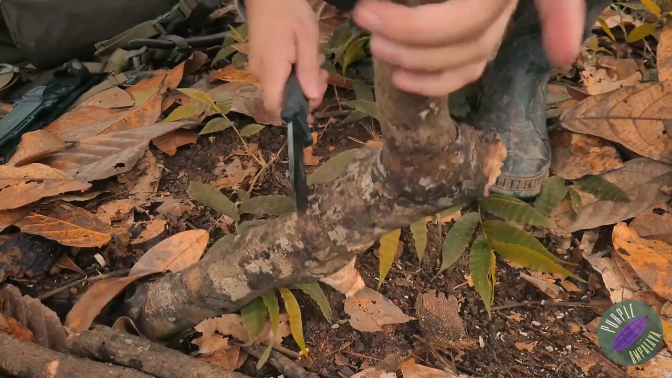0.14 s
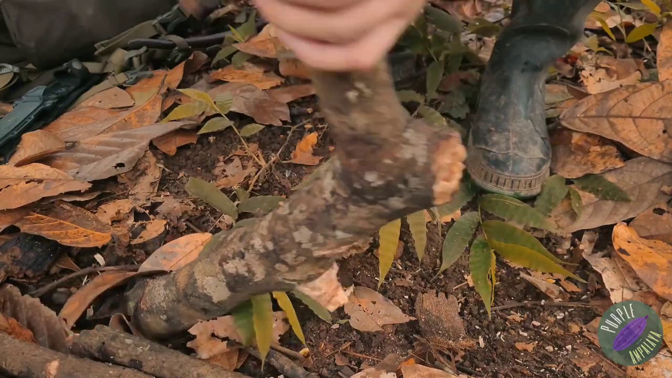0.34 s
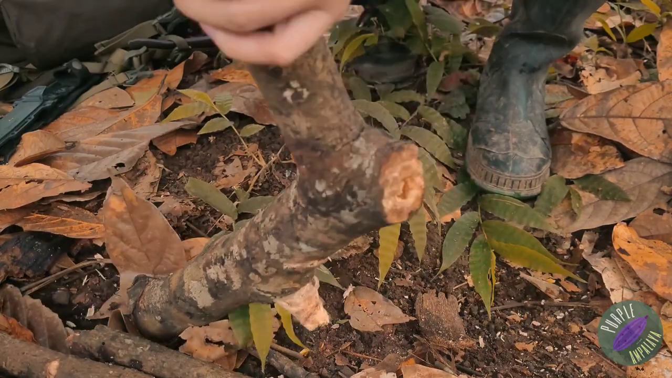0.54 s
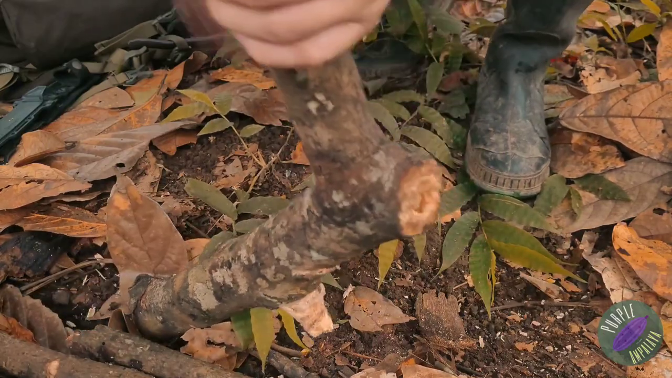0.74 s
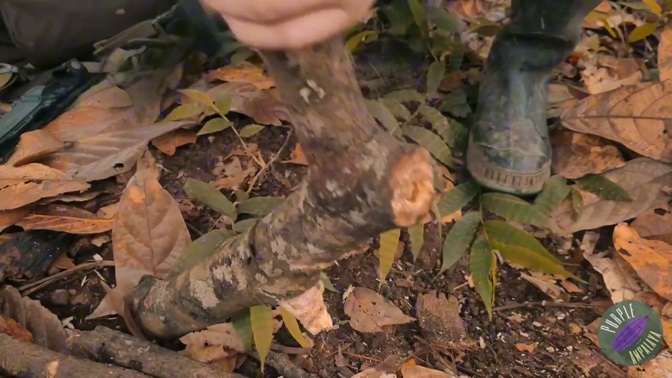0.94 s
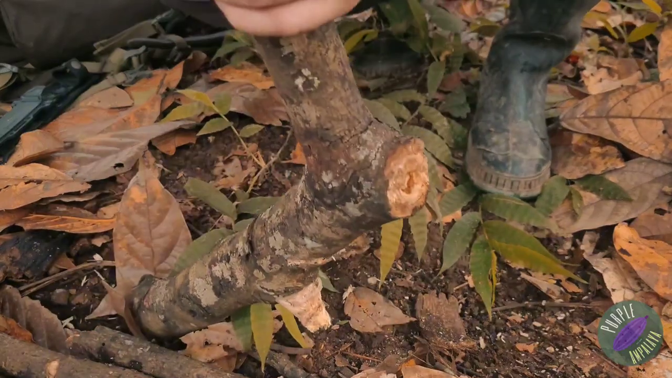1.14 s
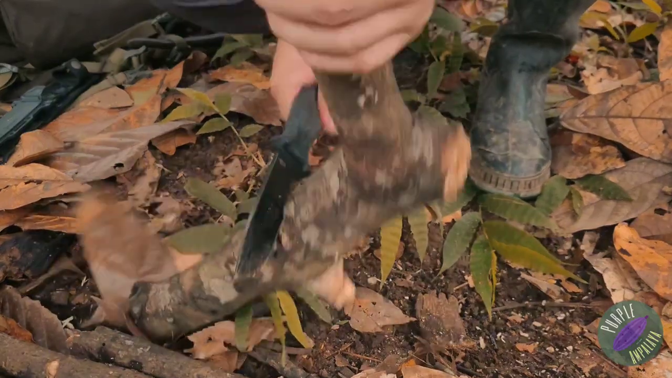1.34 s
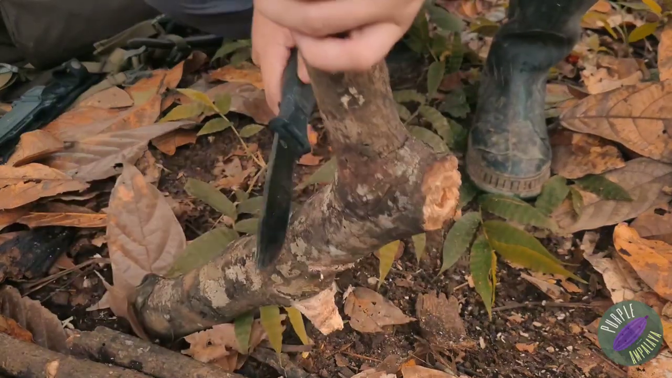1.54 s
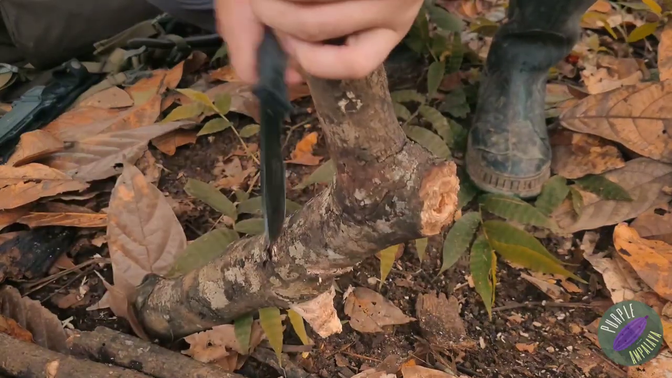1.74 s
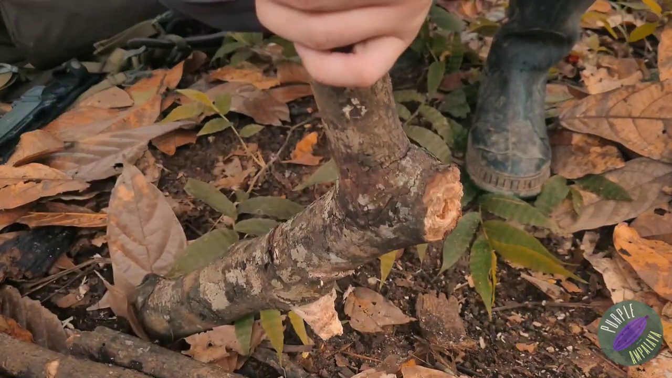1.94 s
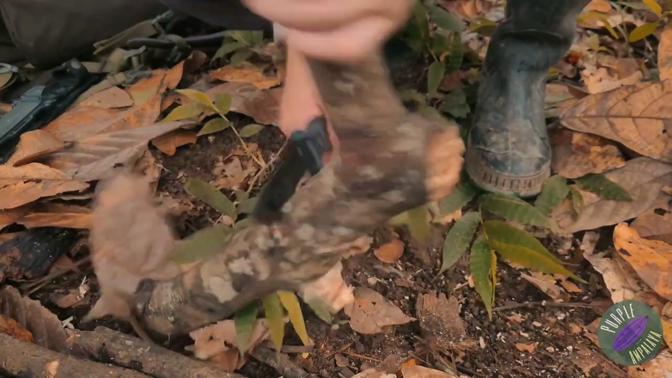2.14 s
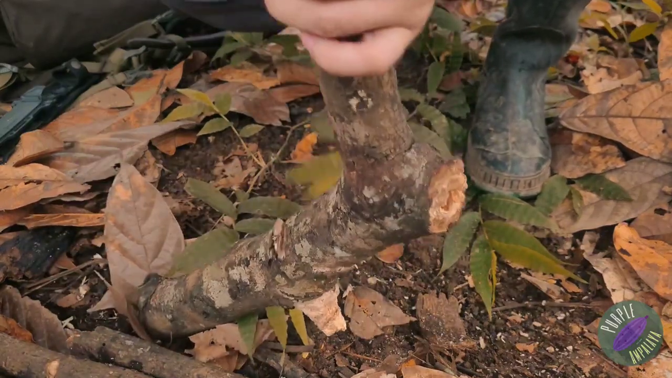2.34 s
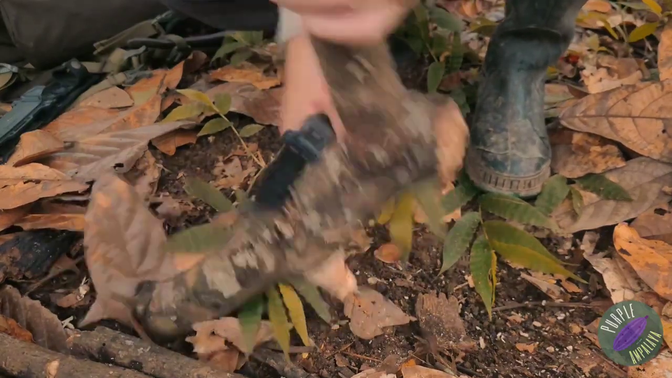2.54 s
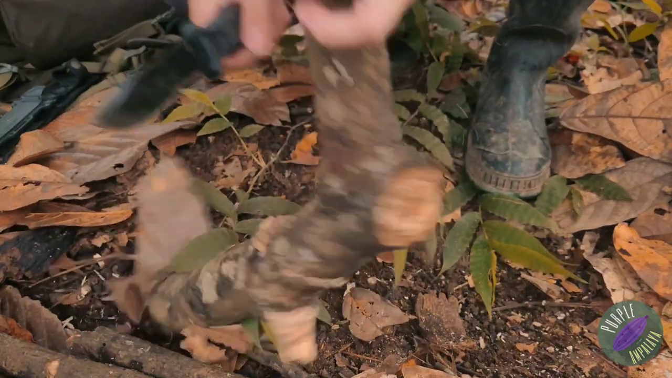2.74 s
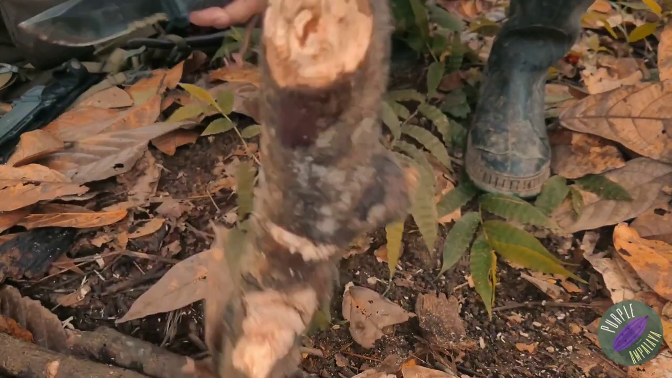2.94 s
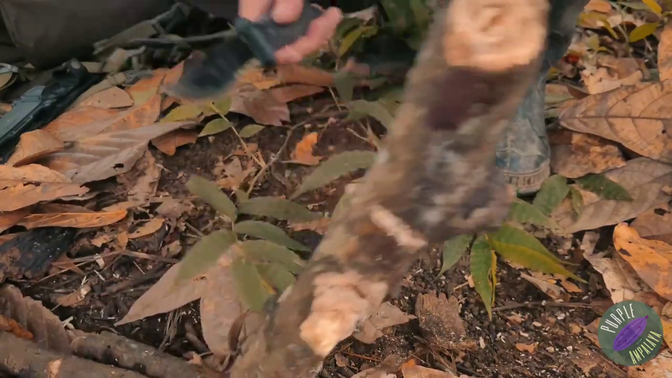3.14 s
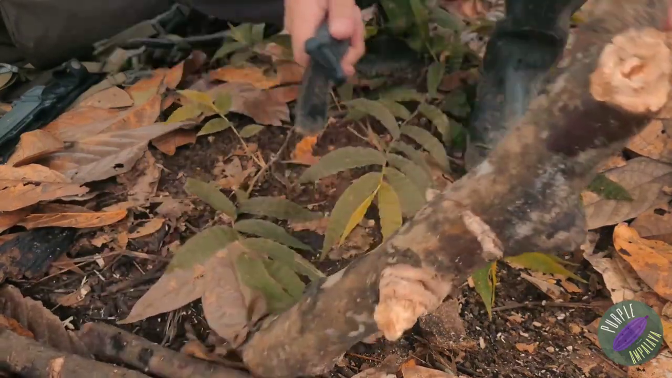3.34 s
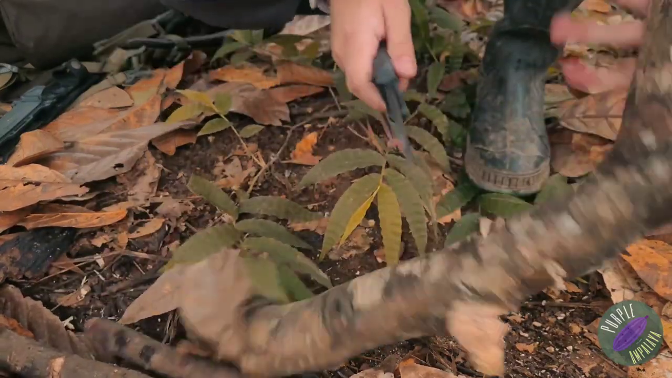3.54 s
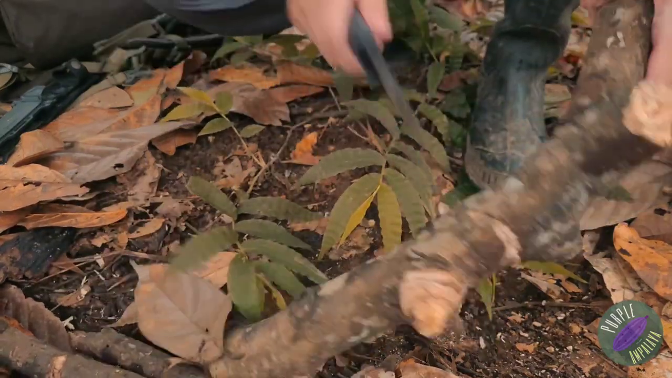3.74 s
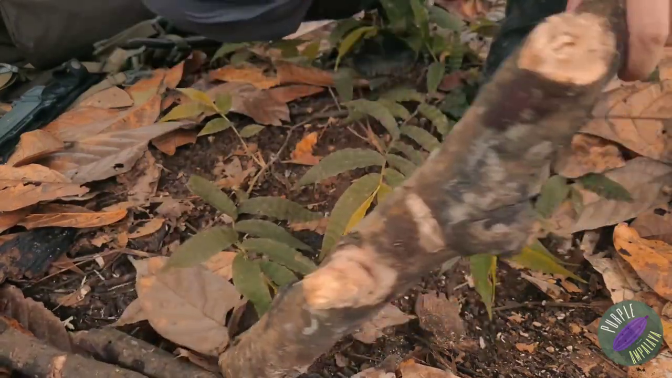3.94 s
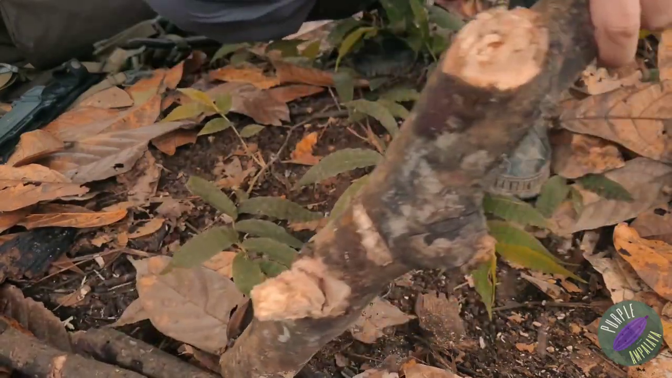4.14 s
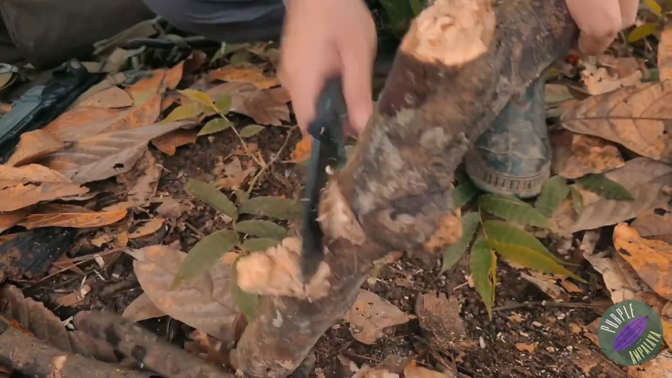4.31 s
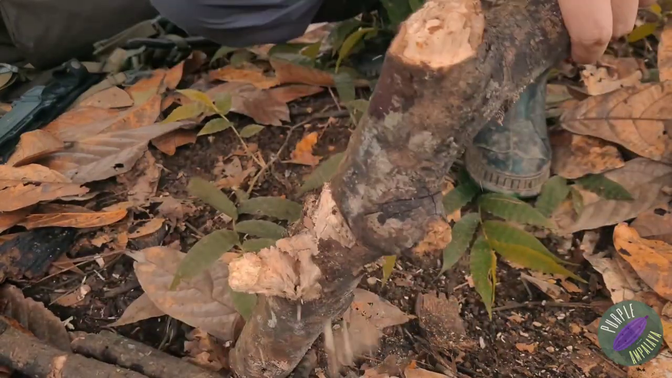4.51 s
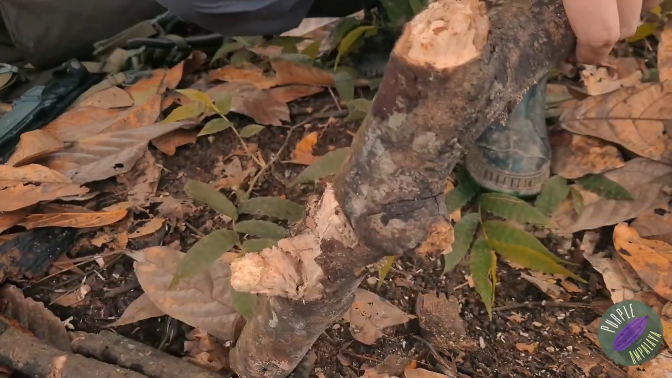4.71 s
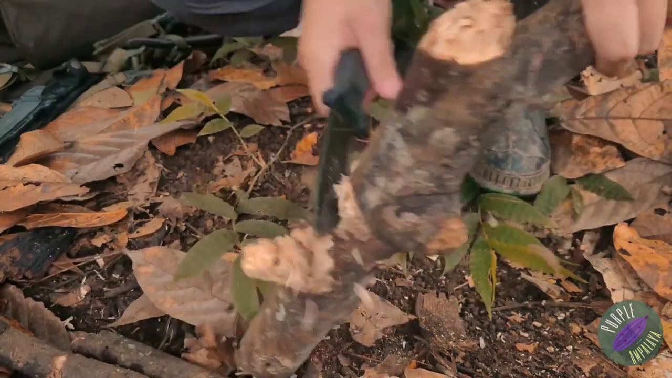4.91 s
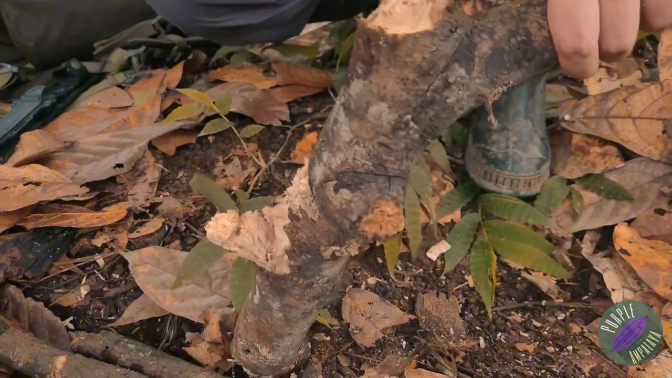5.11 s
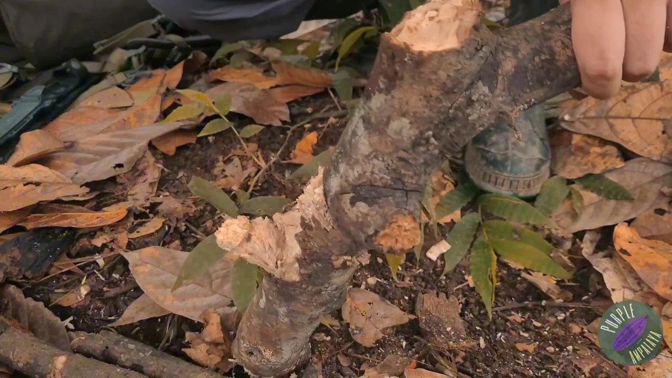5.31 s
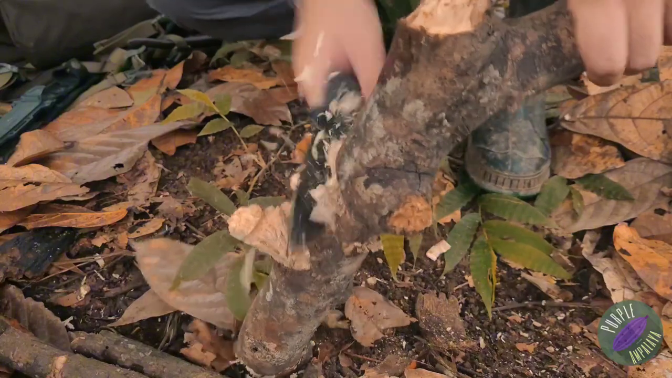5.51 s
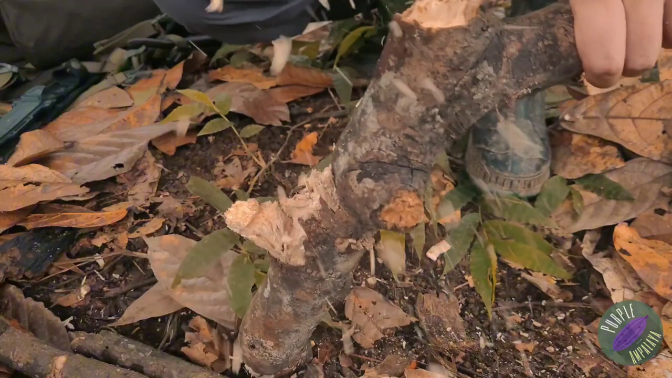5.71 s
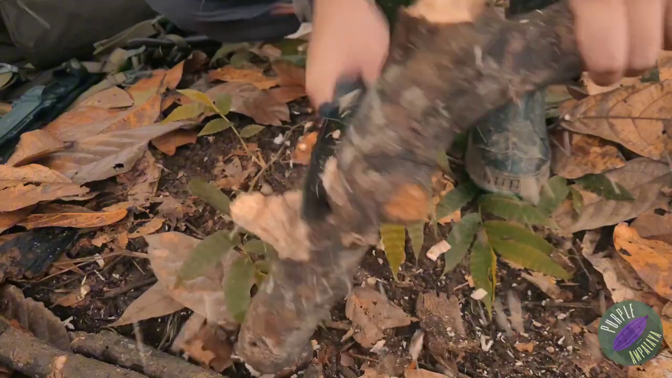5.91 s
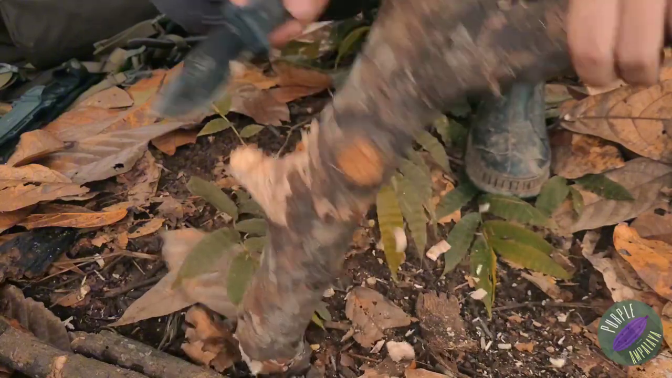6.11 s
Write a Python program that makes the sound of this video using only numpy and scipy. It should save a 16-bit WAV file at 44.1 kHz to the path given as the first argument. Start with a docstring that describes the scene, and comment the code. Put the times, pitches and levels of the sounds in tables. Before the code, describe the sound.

Close stereo pickup in a quiet forest, with faint low rumble, soft air and a thin high insect shimmer throughout. Light leaf shuffles and small taps open the scene; a distant bird gives short falling chirps from 0.4 s, another a rising whistle at 1.2 s. A heavy knife cracks into a thick branch at about 0.8, 1.3, 2.1 and 2.5 s: sharp bark snap, short hollow wood knock, dull soil thump, quick scatter off trunks. Woody clicks come near 1.4 to 1.5 s. From 2.6 to 4 s the branch is hauled through dry leaves in uneven scrapes and crisp crackles. The fifth blow at 4.2 s splits with a brief fibrous tear. More chops land at 4.8, 5.5 and 5.9 s, brighter or duller, with chips and crumbs pattering onto leaves. Birds call again around 5.2 s and 6.1 s; leaf rustle ends it at 6.3 s.

```python
"""Close by in a forest, a heavy knife strikes a branch propped on the ground eight times in 6.3 s.
From the start: filtered-noise rumble, air and insects, leaf scrapes and crackle, click-cluster taps.
From 0.4 s a far bird chirps as noise-modulated falling glides; from 1.2 s another whistles, rising.
From 0.8 s each blow sums a noise crack, decaying modes, a ground thump and scatter; crumbs tap after it.
From 2.6 s the branch is hauled through the litter; at 4.2 s the fifth blow also tears fibres in grain bursts."""
import sys
import numpy as np
from scipy import signal
from scipy.fft import rfft, irfft
from scipy.io import wavfile
from scipy.ndimage import uniform_filter1d

SR = 44100
rng = np.random.default_rng(int(sys.argv[2]) if len(sys.argv) > 2 else 0)


def wrap_up_sound(samples):
    """Save the sound to the file named by the first command line argument, as 16-bit audio."""
    columns = np.atleast_2d(samples).T
    # keep every value between -1 and 1, then stretch to whole-number steps
    tamed = np.clip(columns, -1, 1)
    steps = np.round(tamed * 32767).astype(np.int16)
    wavfile.write(sys.argv[1], SR, steps)


N = 276066  # samples


def amp(db):
    """Level: decibels to an amplitude ratio."""
    return 10 ** (np.asarray(db) / 20)


def evened(x):
    """Normalisation: scales to unit rms."""
    return x / np.sqrt(np.mean(x ** 2) + 1e-20)


def read(points, hz):
    """Interpolation of a spectrum on a log-frequency axis."""
    f, value = np.transpose(points)
    return np.interp(np.log(hz + 1), np.log(f + 1), value)


def add(mix, s, sound):
    """Superposition: adds a sound to the mix from time s."""
    part = mix[:, max(round(s * SR), 0):][:, :sound.shape[-1]]
    part += sound[..., :part.shape[1]]


def bins(x):
    """Discrete Fourier transform: the frequencies of its bins."""
    return np.fft.rfftfreq(x.shape[-1], 1 / SR)


def colour(x, points):
    """Minimum-phase filtering: a causal response of unit energy with the given spectral shape."""
    log_gain = np.log(amp(read(points, abs(np.fft.fftfreq(2048, 1 / SR)))))
    # the phase is the Hilbert transform of the log gain
    spectrum = np.exp(signal.hilbert(log_gain).conj())
    taps = np.fft.ifft(spectrum).real[:1024]
    return signal.oaconvolve(x, taps[None] / np.linalg.norm(taps), axes=1)[:, :x.shape[1]]


def tilted(points, db_per_octave):
    """Spectral tilt: a brighter or duller version of a spectrum."""
    return [(hz, db + db_per_octave * np.log2(hz)) for hz, db in points]


def panned(db):
    """Level difference: gains of the two channels, half the left-right difference each way."""
    return amp(np.array([[.5], [-.5]]) * db)


def ports(x):
    """Arrival-time difference: sound from the branch reaches the left microphone 4 samples early."""
    return np.array([x, np.pad(x, (4, 0))[:len(x)]])


# Diffuse-field coherence at close microphones: f/Hz, left-right likeness (0 to 1)
LIKENESS = [(40, 0.94), (130, 0.9), (300, 0.92), (640, 0.68), (1300, 0.027), (16000, 0.0037)]


def diffuse(x):
    """Diffuse-field coherence: two unrelated channels become alike in the bass."""
    a, b = rfft(x)
    same = np.clip(read(LIKENESS, bins(x)), -1, 1)
    return irfft([a, same * a + np.sqrt(1 - same ** 2) * b], x.shape[1])


def ring(t, hz, t60, rise):
    """Modal decay: a mode excited around t = 0 by a push that builds over the rise time."""
    decay = amp(-60 * np.maximum(t, 0) / t60)
    build = np.exp(-(np.minimum(t, 0) / rise) ** 2)
    return np.cos(2 * np.pi * hz * t) * decay * build


def grains(size, per_s, spread_db):
    """Shot noise: two channels of random clicks of uneven size, unit rms."""
    sizes = amp(spread_db * np.minimum(rng.exponential(1, (2, size)), 4))
    signs = rng.choice([-1, 1], (2, size))
    happens = rng.random((2, size)) < per_s / SR
    return evened(sizes * signs * happens)


# Spectral shape of the sound scattered back: f/Hz, relative level/dB
SCATTER_SPECTRUM = [(40, 1), (150, -4.5), (400, 0), (900, -3), (2000, 0), (5000, -1), (10000, -4.5),
                    (16000, 2.5)]
# Main decay of the scatter: f/Hz, t60/s
FOREST_DECAY = [(100, 0.37), (400, 0.17), (900, .24), (2500, 0.23), (7000, 0.26), (16000, 0.18)]


def forest(x, near_db=2.5, near_t60=.07, far_db=-32, far_t60=0.93):
    """Multiple scattering: dense echoes of ground and trunks, with a faint slow tail of farther trees."""
    echoes = diffuse(grains(size=SR // 2, per_s=9000, spread_db=2.5))
    hz, t, z = signal.stft(echoes, SR, nperseg=128)
    main = amp(-60 * t / read(FOREST_DECAY, hz)[:, None])
    near = amp(near_db - 60 * t / near_t60)
    far = amp(far_db - 60 * t / far_t60)
    tail = signal.istft(z * (main + near + far), SR)[1]
    # the echoes set in over about 3 ms
    tail *= 1 - np.exp(-(np.arange(tail.shape[1]) / SR / .003) ** 2)
    tail = colour(tail / np.linalg.norm(tail, axis=1, keepdims=True), SCATTER_SPECTRUM)
    return signal.fftconvolve(x, tail, axes=1)[:, :x.shape[1]]


# Swell of the low rumble before gusts: t/s, level/dB
RUMBLE_SWELL = [(0, -55), (.8, -52.5), (1.2, -57.5), (2.55, -58), (3.05, -51), (3.6, -55.5), (4.4, -53),
                (5.3, -60), (5.55, -50.5), (6.26, -54.5)]
# Spectral shape of the rumble, shared by the shaking soil: f/Hz, relative level/dB
RUMBLE_SPECTRUM = [(12, -31), (28, -11.5), (50, 2.5), (75, -0.5), (120, -2), (180, -13), (280, -11.5),
                   (450, -24.5), (800, -41), (2000, -69)]
# Spectral shape of still forest air: f/Hz, relative level/dB
AIR_SPECTRUM = [(200, -11), (400, -2.5), (700, -6.5), (1300, -9.5), (2500, -4.5), (3600, -6), (5000, 1),
                (6200, -2.5), (8400, -8), (11000, -0.5), (16000, -5)]
AIR_DB = -66.5
# Resonance-shaped bands of the insect choruses: f/Hz, half width/Hz, level before the swell/dB
INSECT_BANDS = [(7410, 220, -63.5), (10100, 120, -75.5)]
# Slow swell of the insects: t/s, relative level/dB
INSECT_SWELL = [(0, -0.5), (1.2, -4), (2.2, -3.5), (3.2, 2), (3.8, -0.5), (4.25, 2.5), (4.7, -3.5),
                (5.7, 0), (6.26, -3.5)]


def background(rumble_gain_db=0.0, gust_db=-0.3, waver_db=1.0):
    """Filtered noise with slow modulation: low rumble, faint steady air and wavering insects."""
    t, hz = np.arange(N) / SR, np.fft.rfftfreq(N, 1 / SR)
    # gusts: twenty slow sines, 2 to 9 Hz
    gusts = evened(sum(np.sin(2 * np.pi * (f * t + rng.random())) for f in np.geomspace(2, 9, 20)))
    noise = rfft(diffuse(rng.standard_normal((2, N))))
    rumble = evened(irfft(noise * amp(read(RUMBLE_SPECTRUM, hz)), N))
    rumble *= amp(np.interp(t, *np.transpose(RUMBLE_SWELL)) + rumble_gain_db + gust_db * gusts)
    air = amp(AIR_DB) * colour(diffuse(rng.standard_normal((2, N))), AIR_SPECTRUM)
    shrill = rfft(rng.standard_normal((2, N)))
    chorus = 0
    for f, width, db in INSECT_BANDS:
        band = shrill / (1 + ((hz - f) / width) ** 2 / 2)
        chorus = chorus + amp(db) * evened(irfft(band, N))
    # the insects waver with the gust curve reversed in time
    chorus_db = np.interp(t, *np.transpose(INSECT_SWELL)) + waver_db * gusts[::-1]
    return rumble + air + chorus * amp(chorus_db)


# Resonances of flexing dry leaves: f/Hz, bandwidth/Hz, relative level/dB
LEAF_RESONANCES = [(526, 210, -2), (890, 600, 1), (1520, 600, -0.5), (2170, 1400, 2), (3400, 3900, 0.5)]
# Spectral shape of the fine crackle: f/Hz, relative level/dB
CRACKLE_SPECTRUM = [(1000, -34.5), (3000, -7.5), (5000, -2.5), (9000, -3.5), (16000, -4)]
# Hauling the branch round through the litter: t/s, rustle level before gain/dB
HAUL_LEVELS = [(2.64, -58), (2.72, -63.5), (2.78, -48.5), (2.91, -61), (2.98, -46), (3.14, -56),
               (3.23, -49.5), (3.5, -62.5), (3.6, -50.5), (3.75, -57), (3.87, -58.5), (3.95, -64)]
# the crackle gains CRACKLE_GROWTH dB for each dB of scrape above the reference
HAUL_CRACKLE_DB, CRACKLE_GROWTH, RUSTLE_REF_DB = -3.5, 0.88, -62


def litter(levels, crisp_db, scrape_gain_db=1.5, crackle_gain_db=5.0, clump_db=5.5, pan_db=-0.5):
    """Stick-slip friction: each leaf resonance scrapes in its own fits and starts over a fine crackle."""
    s, scrape_db = np.transpose(levels)
    crackle_db = RUSTLE_REF_DB + CRACKLE_GROWTH * (scrape_db - RUSTLE_REF_DB) + crisp_db
    t = np.arange(s[0], s[-1], 1 / SR)
    # one irregular envelope for each leaf resonance, the last for the crackle
    wander = rng.standard_normal((len(LEAF_RESONANCES) + 1, len(t)))
    clumps = evened(amp(clump_db * evened(uniform_filter1d(wander, size=600))))
    scrape = 0
    for (hz, width, db), clump in zip(LEAF_RESONANCES, clumps):
        slips = grains(size=len(t), per_s=700, spread_db=2.5) * clump
        leaf = signal.lfilter(*signal.iirpeak(hz, hz / width, SR), slips)
        scrape = scrape + amp(db) * evened(leaf)
    scrape = evened(scrape) * amp(np.interp(t, s, scrape_db) + scrape_gain_db)
    crackle = colour(grains(size=len(t), per_s=3400, spread_db=5.5), CRACKLE_SPECTRUM)
    crackle *= amp(np.interp(t, s, crackle_db) + crackle_gain_db)
    rustle = scrape + crackle * clumps[-1]
    return s[0], panned(pan_db) * rustle * signal.windows.tukey(len(t), .08)


# Short shuffles of branch and boots in the litter:
# t/s, nominal length/s, rustle level before gain/dB, crackle offset/dB
SHUFFLE_EVENTS = [(-.02, 0.2, -61.5, 2), (0.216, .12, -63.5, -3.5), (0.389, 0.41, -61, -5),
                  (1.509, 0.1, -75.5, 10), (2.321, 0.099, -69.5, -11), (2.48, .05, -60.5, -5),
                  (3.968, 0.085, -65.5, -5.5), (4.186, .05, -63.5, 0), (4.369, 0.31, -65, 0.5),
                  (4.924, .18, -60, -0.5), (5.609, .08, -63, -7), (5.803, .06, -60.5, 0.5),
                  (5.98, 0.28, -56, -2.5)]
SHUFFLE_ATTACK_S, SHUFFLE_RELEASE_S, SHUFFLE_EDGE_DB = .018, 0.062, -2


def shuffle(s, length, db, crackle_db):
    """Friction under a brief push into the leaves: it builds, holds and lets go."""
    held = max(length - SHUFFLE_RELEASE_S, SHUFFLE_ATTACK_S)
    edge_db = db + SHUFFLE_EDGE_DB
    levels = [(s, edge_db), (s + SHUFFLE_ATTACK_S, db),
              (s + held, db), (s + held + SHUFFLE_RELEASE_S, edge_db)]
    return litter(levels, crackle_db)


# Taps of the blade, snapping leaves and falling chips:
# t/s, relative woody level/dB, leafy level/dB, crisp level/dB, left-right difference/dB
TAP_EVENTS = [(.114, -46.5, -36, -37, -5), (.240, -49, -36.5, -44, -1.5), (.390, -57, -48.5, -43.5, 3.5),
              (.453, -45, -64, -68, -1.5), (1.019, -66, -53.5, -60, -8.5), (1.123, -70, -61, -61, -10.5),
              (1.157, -70.5, -72.5, -53, -6), (1.421, -31, -34.5, -38, -1), (1.487, -69, -57.5, -40.5, 0.5),
              (1.5012, -28, -43, -42, 1), (1.611, -42.5, -42.5, -42.5, -5.5), (1.725, -53, -56.5, -56, -11),
              (1.886, -68.5, -57.5, -51.5, -1.5), (2.680, -71, -50.5, -42.5, 1.5),
              (2.833, -48.5, -37.5, -44, 0), (2.851, -70, -41, -41, 8), (3.013, -52.5, -37.5, -39.5, -5),
              (3.074, -52, -42.5, -34.5, -2), (3.103, -44.5, -36.5, -32, -2.5),
              (3.345, -60, -56, -41, -3.5), (3.529, -66, -51, -39, -5), (3.593, -42, -37, -48, -2.5),
              (3.979, -49.5, -44.5, -33.5, -6), (4.423, -59.5, -44.5, -43, 1),
              (4.472, -60.5, -52, -40.5, -4), (4.508, -68, -53, -41.5, 3), (4.531, -49, -42.5, -43.5, 0),
              (4.577, -65, -45, -34, 0), (4.610, -39, -37.5, -35, 0.5), (4.942, -32, -46, -34, -1.5),
              (5.087, -69, -61, -51, 3), (5.545, -59, -40, -30.5, 3), (5.614, -60, -45.5, -35.5, -1),
              (5.668, -69, -48, -45, 1), (5.747, -45.5, -41, -44.5, 1.5), (5.827, -39, -38.5, -41.5, -6.5),
              (5.920, -36.5, -36, -37, 0), (6.018, -71, -37.5, -39.5, -6.5),
              (6.142, -46.5, -40, -34.5, 6.5), (6.178, -66, -43.5, -42, 6), (6.207, -52, -38.5, -35.5, -4)]
# Spectral shapes of the three parts of a tap: f/Hz, relative level/dB
WOODY_SPECTRUM = [(80, -18.5), (250, 3.5), (700, 0.5), (1200, -10), (2500, -35.5), (8000, -63.5)]
LEAFY_SPECTRUM = [(200, -40.5), (700, -7.5), (1200, 10.5), (2300, 5.5), (4000, -11), (8000, -19.5),
                  (16000, -51.5)]
CRISP_SPECTRUM = [(500, -53.5), (2500, -11), (4500, 8.5), (8000, 3), (16000, 2.5)]
TAP_S = 0.0022  # from the start of a tap to its snap
TAP_KNOCK_HZ, TAP_KNOCK_T60, TAP_KNOCK_DB = 730, .014, 0.5  # brief note of the wood; dB re woody level


def tap(s, woody_db, leafy_db, crisp_db, pan_db, push_db=15, woody_rattle_db=-6,
        leafy_rattle_db=0, snap_db=2, crisp_rattle_db=0):
    """Impact excitation: one sharp contact in a cluster of clicks, sounding in wood and dry leaf."""
    t = np.arange(SR // 12) / SR
    # the cluster dies away fast, then rattles on faintly
    envelope = t / TAP_S * (np.exp(-2 * t / TAP_S) + 0.049 * np.exp(-.6 * t / TAP_S))
    clicks = diffuse(grains(size=len(t), per_s=9000, spread_db=5.5) * envelope)
    clicks = clicks * np.sqrt(0.002 * SR / (clicks ** 2).sum(1).mean())
    contact = ports(np.sinc((t - TAP_S) * SR))
    woody_push = amp(push_db) * contact + amp(woody_rattle_db) * clicks
    woody = amp(woody_db) * colour(woody_push, WOODY_SPECTRUM)
    knock = ports(ring(t - TAP_S, TAP_KNOCK_HZ, TAP_KNOCK_T60, rise=.0007))
    woody += amp(woody_db + TAP_KNOCK_DB) * knock
    leafy = amp(leafy_db + leafy_rattle_db) * colour(clicks, LEAFY_SPECTRUM)
    crisp_snap = amp(snap_db) * contact + amp(crisp_rattle_db) * clicks
    crisp = amp(crisp_db) * colour(crisp_snap, CRISP_SPECTRUM)
    return s, panned(pan_db) * (woody + leafy + crisp)


# A far bird repeating one falling chirp: t/s, level/dB
BIRD_CHIRPS = [(.41, -66), (.637, -59.5), (1.63, -64), (1.77, -66), (1.92, -62.5), (2.076, -63),
               (2.366, -66), (4.123, -61), (4.715, -60.5), (5.055, -62.5), (5.193, -61.5), (5.34, -61),
               (6.06, -61), (6.204, -61)]
CHIRP_S, CHIRP_FROM_HZ, CHIRP_TO_HZ, CHIRP_BLUR_HZ = .066, 5170, 4660, 280
# Another answering with a rising whistle: t/s, start f/Hz, level/dB
BIRD_WHISTLES = [(1.22, 5600, -66), (1.88, 5450, -73), (5.17, 5910, -61), (5.346, 6240, -57.5)]
WHISTLE_S, WHISTLE_RISE_HZ, WHISTLE_BLUR_HZ = .12, 800, 420


def chirp(s, length, start_hz, end_hz, db, blur_hz):
    """Modulation of a gliding tone by narrow-band noise: a chirp blurred by its way through the trees."""
    t = np.arange(0, length, 1 / SR)
    turns = np.cumsum(np.interp(t, [0, length], [start_hz, end_hz])) / SR
    noise = rng.standard_normal((2, 2, SR // 4))
    real, imaginary = signal.lfilter(*signal.butter(2, blur_hz, fs=SR), noise)[..., :len(t)]
    glide = ((real + 1j * imaginary) * np.exp(2j * np.pi * turns)).real
    return s, amp(db) * evened(glide) * signal.windows.tukey(len(t), .5)


# Blows of the knife: t/s, bite time/s, branch knock level/dB, factor on branch f, factor on branch t60,
# ring at the cut f/Hz, level/dB, its upper ring f/Hz, level/dB, bark crack level/dB,
# crack brightness/(dB per octave), ground thump level/dB, scatter level/dB, left-right difference/dB.
# Levels are relative settings of each part.
BLOWS = [(.7720, .001, -14.5, 1.07, 2.6, 700, -12, 1462, -11, -13.5, -1.2, -23.5, 1, 1.5),
         (1.2923, .0013, -8.5, .98, 0.66, 710, -16, 1300, -8, -12.5, 0.036, -20.5, -2, 1.5),
         (2.1359, .0014, -14, 1.01, 0.78, 736, -6, 1250, -8.5, -9, -2.44, -28.5, -1.5, 1.5),
         (2.5283, 0.00082, -11.5, 1.07, 3, 674, -10.5, 1444, -23.5, -8.5, -0.15, -23, -1.5, 2.5),
         (4.24, 0.000903, -13, 1.05, 0.83, 1130, -40, 1640, -17, -9.5, 0.028, -27, -1, 4),
         (4.7860, 0.0012, -13.5, .908, 1.8, 990, -19, 2670, -14, -9.5, 1, -20.5, -5, 5),
         (5.4634, 0.002043, -15.5, 1, 0.72, 510, -12, 1920, -13.5, -11.5, -0.076, -19.5, -3.5, 4.5),
         (5.8639, .0022, -15.5, 1.37, 0.35, 950, -15, 1764, -10, -11.5, .2, -18.5, -5.5, 4)]
# Spectral shapes of the crack, and of the crack as it goes out to be scattered: f/Hz, relative level/dB
CRACK_SPECTRUM = [(200, -18.5), (700, -7.5), (1500, 6), (3000, 0.5), (5000, 3.5), (7000, -2), (12000, -6.5),
                  (16000, -5)]
SPRAY_SPECTRUM = [(100, -7), (300, 4), (700, 3.5), (1100, 2), (1600, 2), (2700, 0), (5000, -4),
                  (7000, -3.5), (12000, -2.5), (16000, -10)]
# Bending modes of the branch before each blow's factors: f/Hz, relative level/dB, t60/s
BRANCH_MODES = [(258, -8, 0.083), (348, -12, 0.06), (396, -20.5, 0.0038), (584, -10.5, 0.029),
                (970, -34, 0.0027), (2800, -13.5, 0.029), (4350, -18.5, 0.0072)]
# Modes of the branch bouncing on the soil: f/Hz, relative level/dB, t60/s
SOIL_MODES = [(61, -9.5, 0.18), (96, -8, 0.069)]
CUT_T60, CUT_UPPER_T60 = 0.014, 0.014  # s; the blade in the cut damps the wood at once
LONGEST_T60 = .055  # s, limit on the branch modes


def chop(s, bite, knock_db, pitch, hold, ring_hz, ring_db, upper_hz, upper_db, crack_db, bright_db,
         thump_db, scatter_db, pan_db, wood_wet_db=-6, cut_wet_db=-9, spray_db=1, snap_db=10, shake_db=-7):
    """Impact and modal response: the edge crushes bark, stops in ringing wood; the branch bounces on soil."""
    t = np.arange(SR // 2) / SR
    stop = t - bite
    crush = np.minimum(t / 0.0001, 1) * np.exp(-np.maximum(stop, 0) / 0.0018)
    shared = ports(rng.standard_normal(len(t)))
    fibres = evened(shared + 0.73 * rng.standard_normal((2, len(t))))
    snap = amp(snap_db) * ports(np.sinc((t - bite / 2) * SR))  # the bark gives way
    crack = amp(crack_db) * colour(fibres * crush + snap, tilted(CRACK_SPECTRUM, bright_db))

    wood = 0
    for hz, db, t60 in BRANCH_MODES:
        wood = wood + amp(db) * ring(stop, hz * pitch, min(t60 * hold, LONGEST_T60), rise=0.0037)
    wood = amp(knock_db) * wood
    cut = amp(ring_db) * ring(stop, ring_hz, CUT_T60, rise=.001)
    cut += amp(upper_db) * ring(stop, upper_hz, CUT_UPPER_T60, rise=0.00048)
    onset = np.minimum(t / 0.00016, 1)
    wood = panned(pan_db) * ports(wood * onset)
    cut = panned(pan_db) * ports(cut * onset)

    # the crack leaves in all directions, so what comes back is evenly broad
    spray = colour(ports(signal.unit_impulse(len(t))), tilted(SPRAY_SPECTRUM, bright_db))
    spray *= amp(crack_db + spray_db) * np.linalg.norm(crush)
    scatter = amp(scatter_db) * forest(spray + amp(wood_wet_db) * wood + amp(cut_wet_db) * cut)

    # the soil gives under the branch and shakes unevenly around it
    bounce = sum(amp(db) * ring(t - .016, hz, t60, rise=0.0062) for hz, db, t60 in SOIL_MODES)
    shake = colour(rng.standard_normal((2, len(t))), RUMBLE_SPECTRUM)
    shake *= amp(shake_db) * np.exp(-t / 0.026)
    thump = amp(thump_db) * (bounce + shake) * np.minimum(t / 0.0028, 1)
    return s, crack + wood + cut + scatter + thump


CRUMB_FLIGHT_S, CRUMB_DB, CRUMB_SPREAD_DB = (0.11, 0.41), -56, 2  # flight: shortest, longest


def crumbs(blow_s, count=3, woody_db=-9, leafy_db=-4, pan_db=-5):
    """Random impacts: crumbs of bark land as faint taps after a blow."""
    delays = rng.uniform(*CRUMB_FLIGHT_S, count)
    sizes = CRUMB_DB + CRUMB_SPREAD_DB * rng.standard_normal(count)
    return [tap(blow_s + delay, db + woody_db, db + leafy_db, db, pan_db)
            for delay, db in zip(delays, sizes)]


# Fibres tearing as the blade runs through: t/s, length before decay/s, relative level/dB
TEAR_EVENTS = [(4.241, 0.0025, -23), (4.251, 0.0098, -18), (4.2579, 0.0051, -17), (4.263, 0.0066, -27.5),
               (4.281, 0.016, -35)]
# Spectral shape of tearing: f/Hz, relative level/dB
TEAR_SPECTRUM = [(100, -3.5), (400, -19), (900, 3.5), (1700, 4), (4500, -0.5), (7000, -2), (16000, -2)]


def tear(s, length, db, wet_db=-6):
    """Fracture as shot noise: a run of tiny breaks as a chip splits off."""
    t = np.arange(SR // 3) / SR
    envelope = np.exp(-np.maximum(t - length, 0) / 0.00116)
    burst = grains(size=len(t), per_s=12000, spread_db=2.0) * envelope
    direct = amp(db) * colour(burst, TEAR_SPECTRUM)
    return s, direct + amp(wet_db) * forest(direct)


def scene(small_wet_db=-8):
    """Superposition: blows, small sounds with their scatter, and the forest behind."""
    blows, small = np.zeros((2, 2, N))
    for row in SHUFFLE_EVENTS:
        add(small, *shuffle(*row))
    for row in TAP_EVENTS:
        add(small, *tap(*row))
    for s, db in BIRD_CHIRPS:
        add(small, *chirp(s, CHIRP_S, CHIRP_FROM_HZ, CHIRP_TO_HZ, db, CHIRP_BLUR_HZ))
    for row in BLOWS:
        add(blows, *chop(*row))
        for crumb in crumbs(row[0]):
            add(small, *crumb)
    for s, hz, db in BIRD_WHISTLES:
        add(small, *chirp(s, WHISTLE_S, hz, hz + WHISTLE_RISE_HZ, db, WHISTLE_BLUR_HZ))
    add(small, *litter(HAUL_LEVELS, HAUL_CRACKLE_DB))
    for row in TEAR_EVENTS:
        add(blows, *tear(*row))
    return blows + small + amp(small_wet_db) * forest(small) + background()


# Response difference of the two microphones: f/Hz, left-right difference/dB
MICROPHONE_BALANCE = [(40, 0), (120, -2.5), (250, -0.5), (500, -2.5), (1000, -3), (2000, -1), (5000, -3),
                      (10000, -1), (16000, -0.5)]
EDGE_HZ = 16050  # upper band limit


def record(dry):
    """Transduction: two slightly unlike microphones, a low cut, clipping of peaks, and a band limit."""
    x = irfft(rfft(dry) * panned(read(MICROPHONE_BALANCE, bins(dry))), N)
    x = signal.lfilter(*signal.butter(2, 30, "high", fs=SR), x)
    x = np.clip(x, -1, 1)
    band_limit = signal.firwin(301, EDGE_HZ, window=("kaiser", 8), fs=SR)
    return signal.oaconvolve(x, band_limit[None], "same")


dry = scene()
out = record(dry)
wrap_up_sound(out)
```